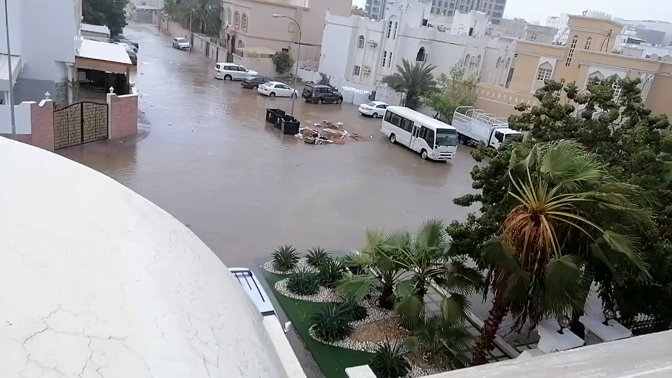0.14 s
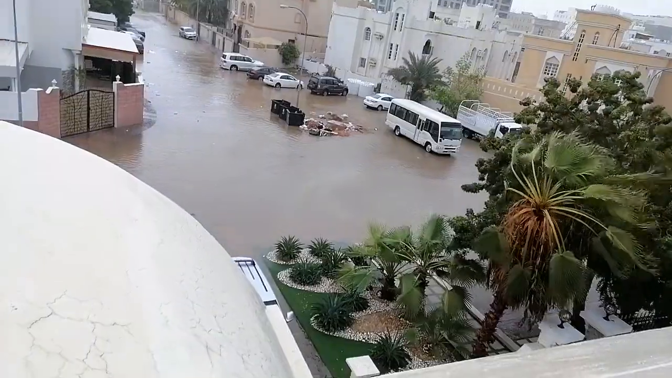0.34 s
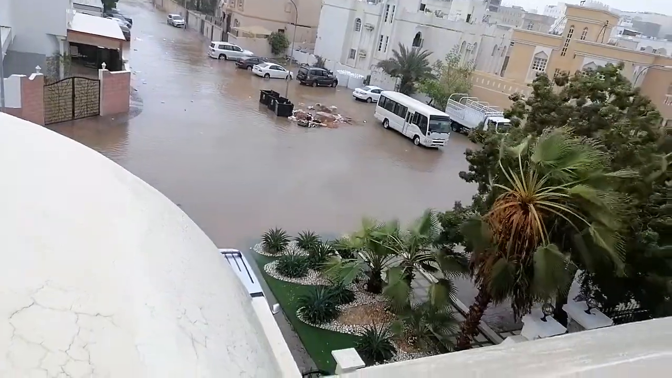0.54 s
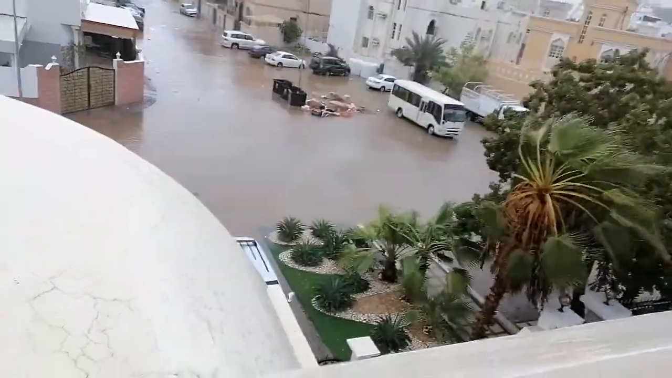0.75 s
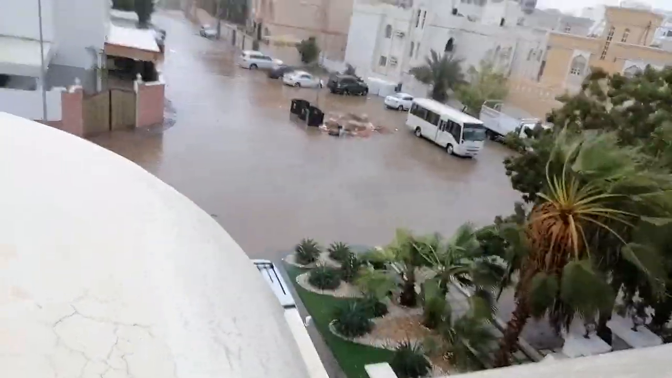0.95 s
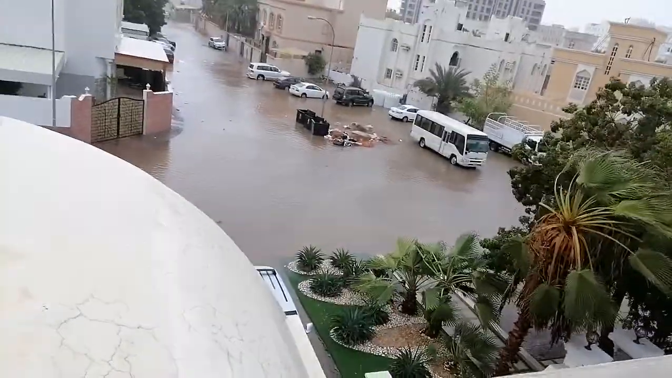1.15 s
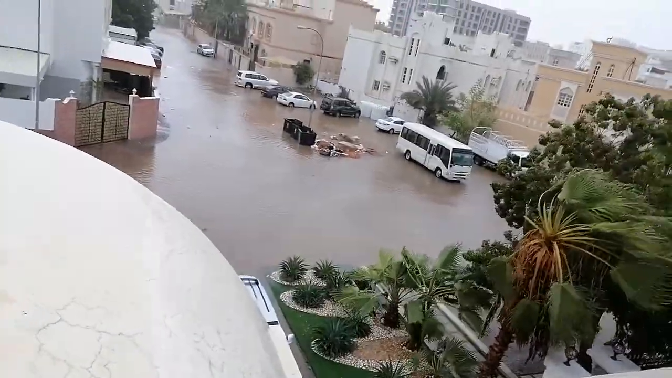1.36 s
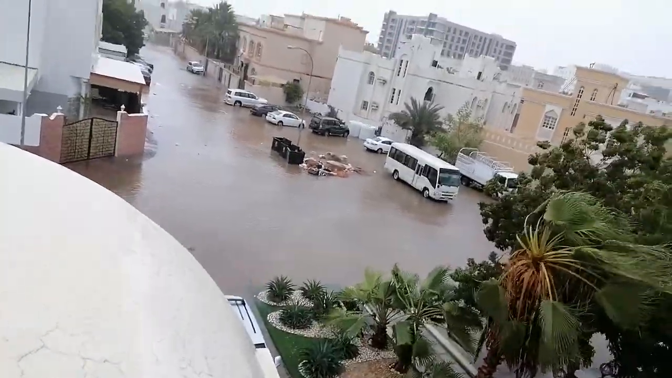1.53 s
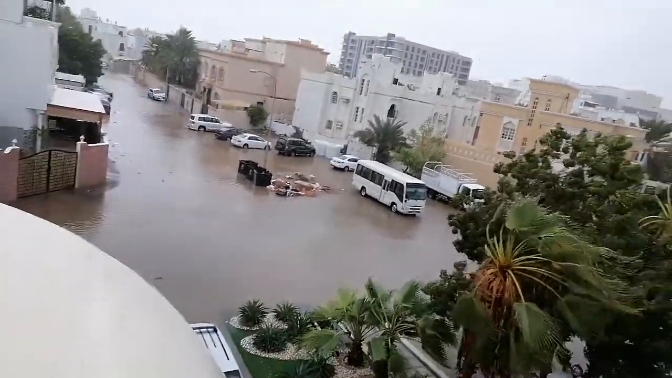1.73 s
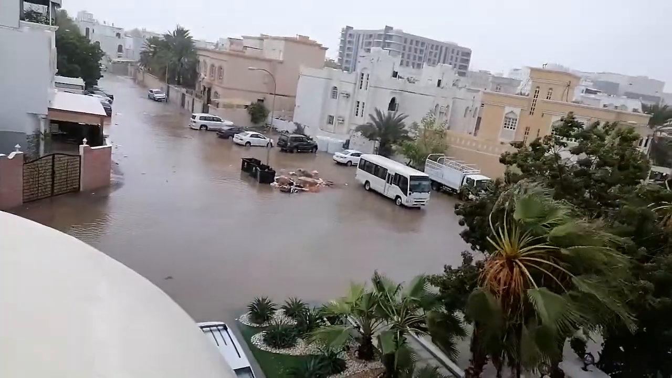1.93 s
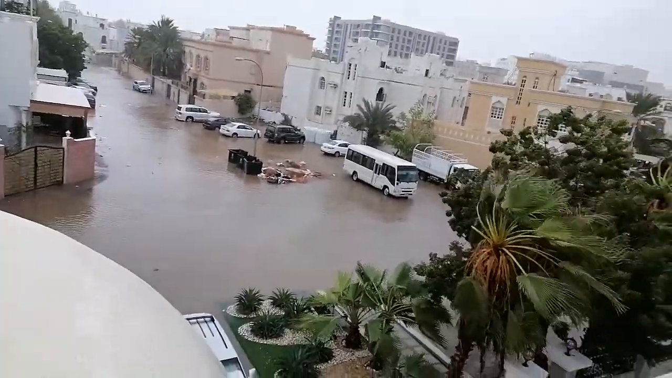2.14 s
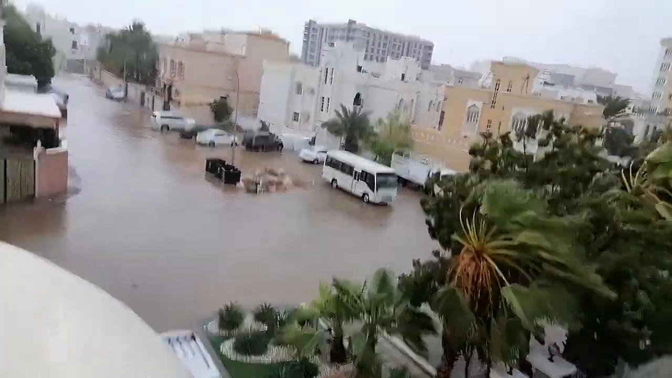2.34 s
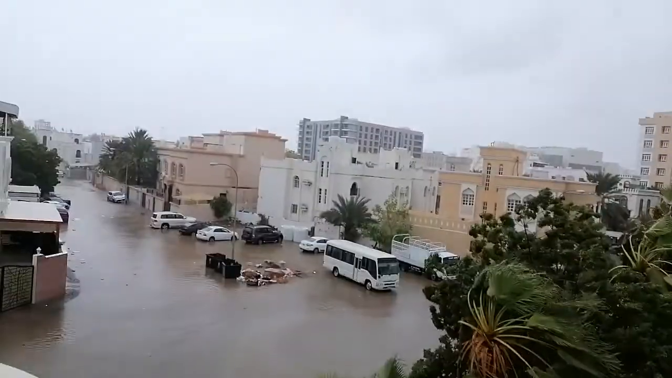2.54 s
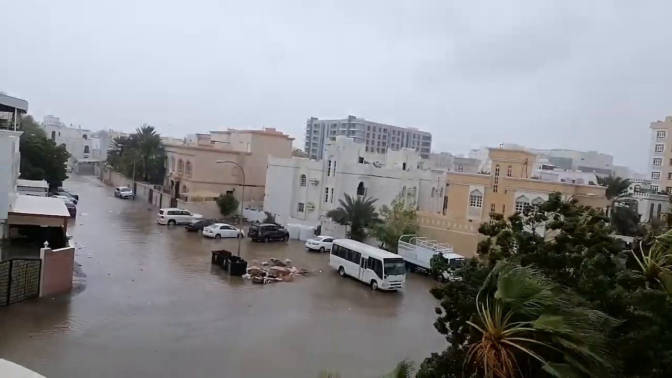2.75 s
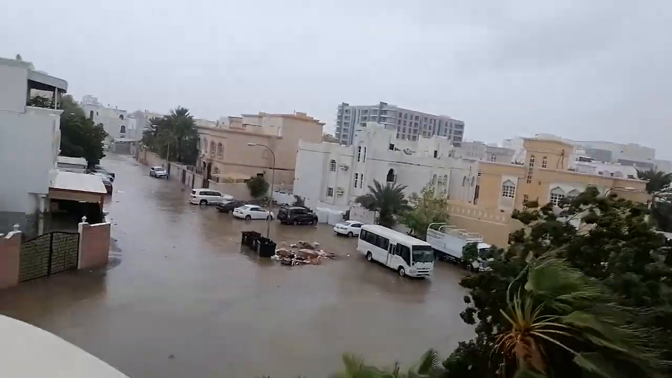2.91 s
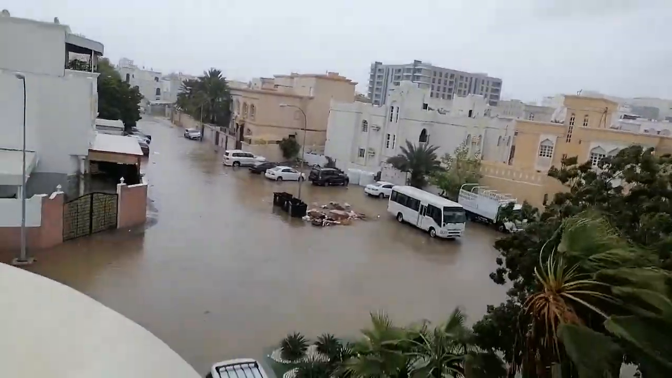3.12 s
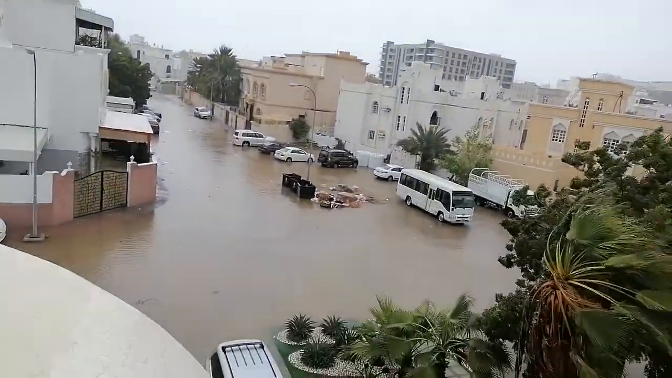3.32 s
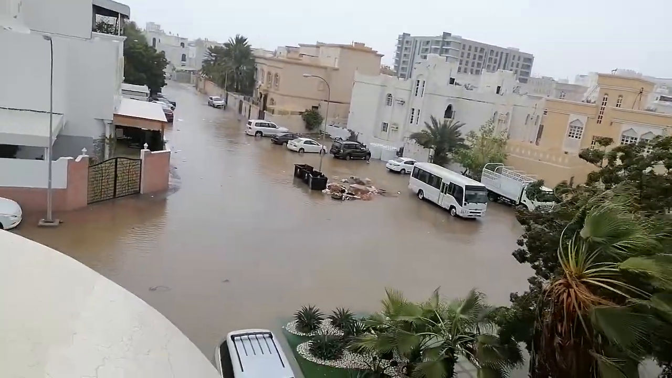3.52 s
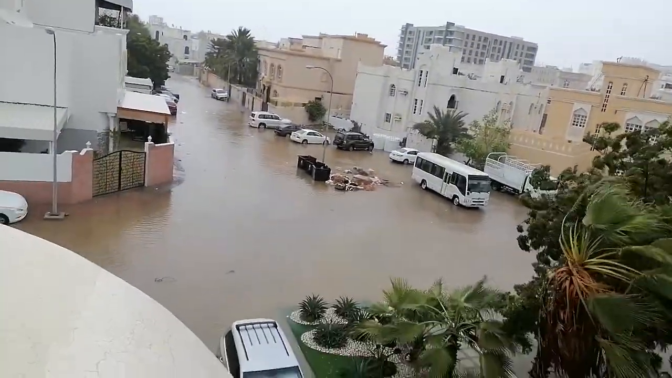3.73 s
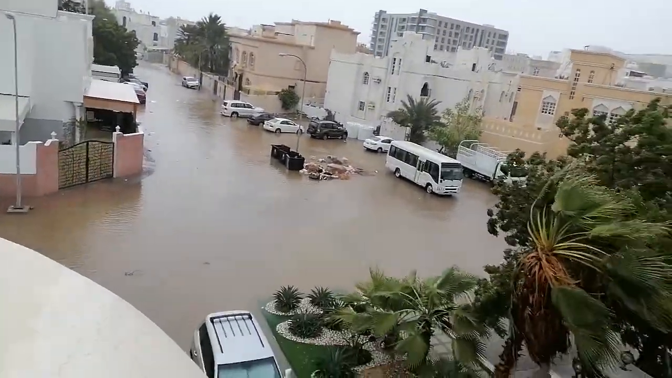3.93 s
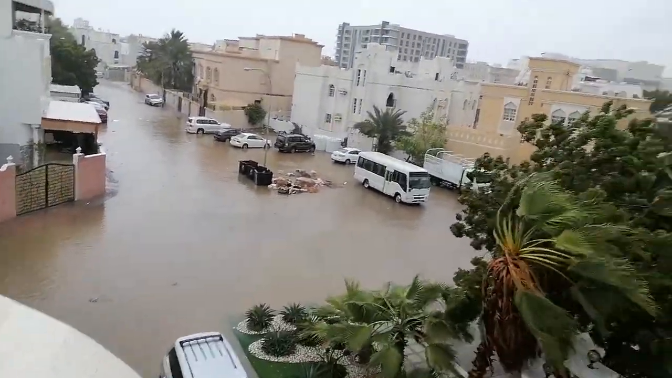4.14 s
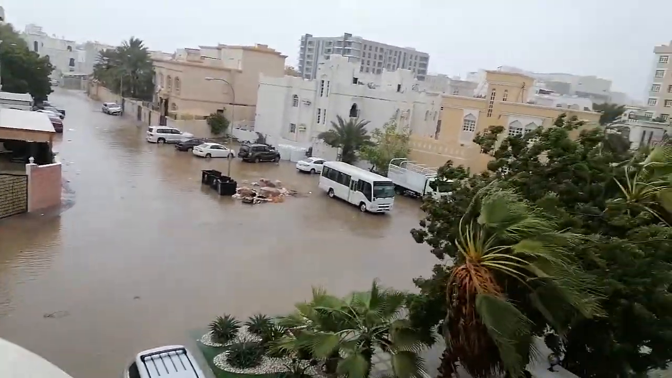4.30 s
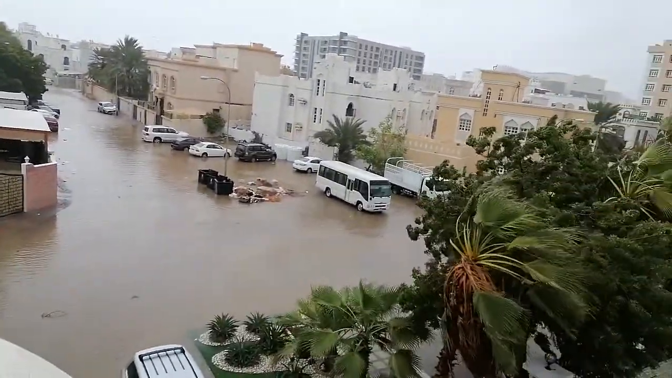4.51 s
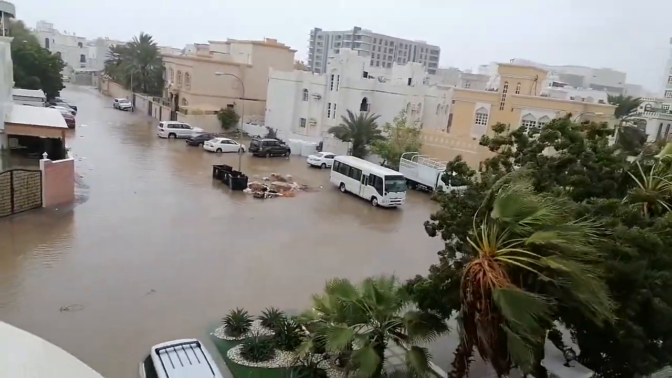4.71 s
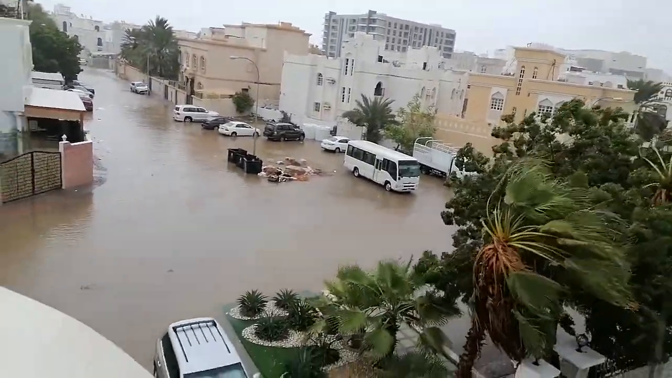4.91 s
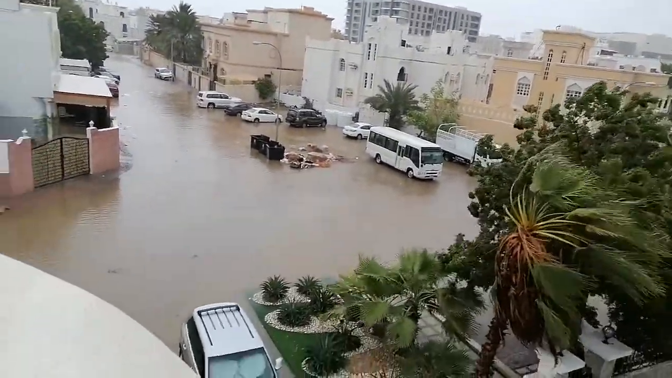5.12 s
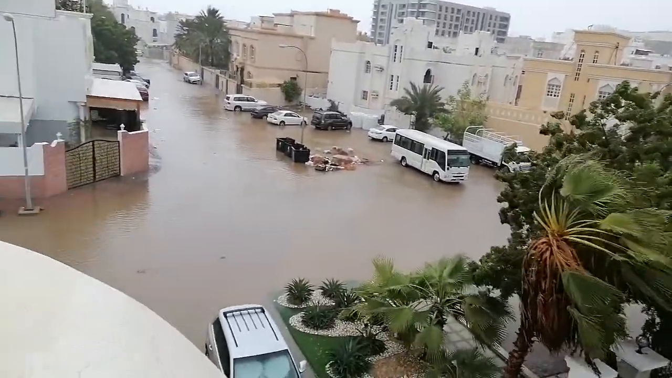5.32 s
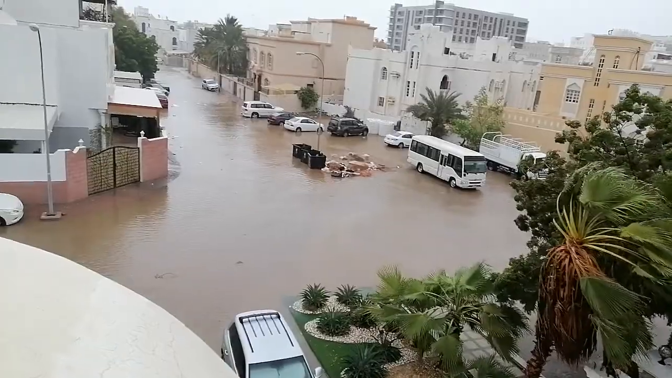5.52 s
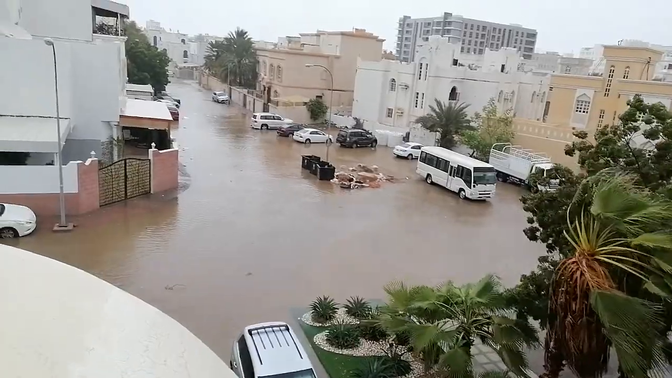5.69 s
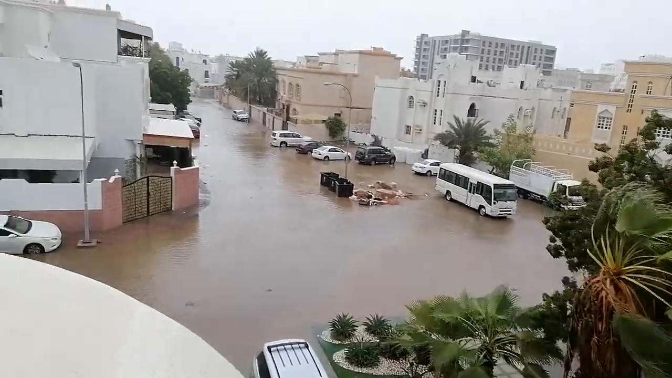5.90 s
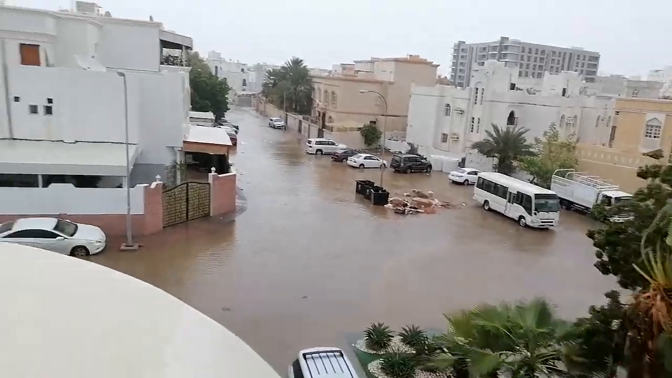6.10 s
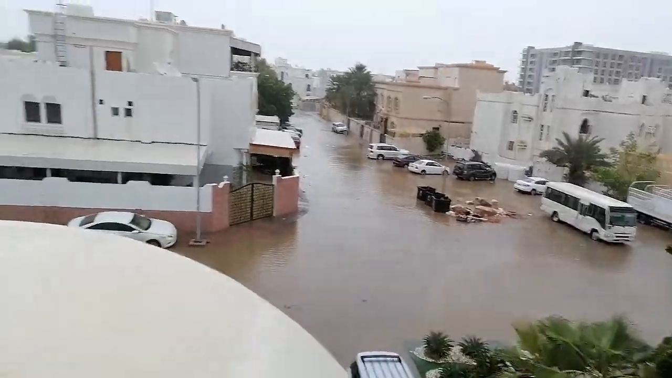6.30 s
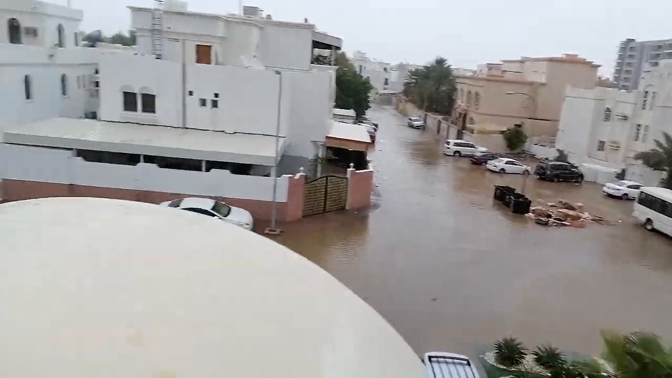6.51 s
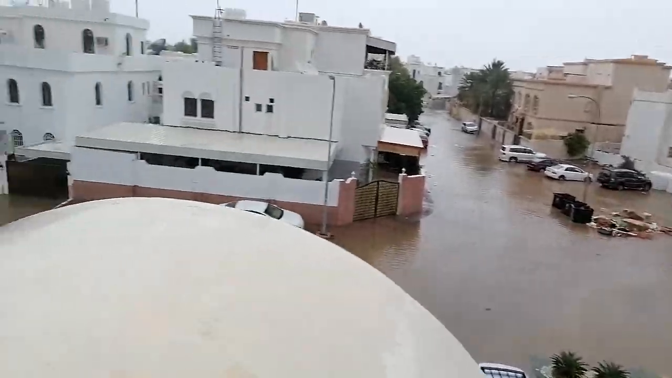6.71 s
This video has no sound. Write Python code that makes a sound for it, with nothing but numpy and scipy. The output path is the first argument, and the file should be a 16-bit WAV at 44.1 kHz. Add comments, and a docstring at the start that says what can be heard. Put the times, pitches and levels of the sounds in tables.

```python
"""Rooftop storm wind on a phone

After a short silence, wind cuts in and buffets a hand-held phone's two microphone ports, each on its own.
Eddies slap the ports, louder and brighter as the air speeds up, and the fastest tear off with a snap.
Rain hisses and trees roar in the street below, pushed down by gain control under each gust.
A few drops strike the case and make it ring; one throws a hiss of spray."""
import sys
import numpy as np
from scipy import signal
from scipy.fft import rfft, irfft, next_fast_len
from scipy.io import wavfile
from scipy.ndimage import uniform_filter1d

SR = 44100
rng = np.random.default_rng(int(sys.argv[2]) if len(sys.argv) > 2 else 0)


def unload_audio(sound):
    """Save the sound as a 16-bit wav file, at the path given as the first command line argument."""
    columns = np.transpose(np.atleast_2d(sound))
    # keep every value between -1 and 1, then stretch to whole-number steps
    steps = np.round(np.clip(columns, -1, 1) * 32767)
    wavfile.write(sys.argv[1], SR, steps.astype(np.int16))


N = 297675

# steady flow over the ports: (time [s], left level [dB], right level [dB], left air speed [m/s])
STEADY_FLOW = [(0.4, -32.5, -37, 11.7), (0.64, -36.5, -53, 4.1), (0.7, -24.5, -51, 17.3),
               (0.87, -33, -42, 18), (0.92, -39, -36, 30), (0.97, -30, -42, 17.6), (1.04, -26, -44, 15.7),
               (1.18, -41, -27, 38.4), (1.25, -34, -40, 5), (1.7, -30, -40, 5.35), (1.86, -50, -51, 6.3),
               (2.0, -29, -27, 4.23), (2.42, -23.5, -44.5, 5.9), (2.6, -29, -47, 4.7),
               (2.88, -38.5, -52, 6.1), (3.05, -38.5, -49, 2.95), (3.3, -27.5, -35, 5.84),
               (3.85, -24, -31, 5.84), (4.1, -32, -42, 5), (4.6, -34.5, -43, 4), (4.75, -20.5, -43, 7.9),
               (4.85, -41, -38, 6), (5.1, -29, -52, 5.2), (5.3, -39.5, -60, 3.1), (5.5, -30.5, -45, 7.2),
               (6.1, -32.5, -38, 4.3), (6.25, -40.5, -39.5, 1.9), (6.45, -18.5, -38, 6.5),
               (6.59, -25, -36, 10.7), (6.64, -24, -38, 6.7), (6.75, -15, -21.5, 14.5)]
# the strongest eddies, each slapping one port: (time [s], port [0 left, 1 right], level [dB], length [ms])
EDDY_SLAPS = [(.42, 0, -27.5, 14), (.442, 0, -20.5, 7), (.458, 0, -18.5, 14.6), (.515, 0, -28.5, 35),
              (.515, 1, -31.5, 80), (.686, 0, -24, 13.5), (.718, 0, -21, 12), (0.763, 0, -18.5, 33),
              (0.798, 0, -17, 10), (.815, 1, -28, 61), (.82, 0, -20, 32), (0.87, 0, -22, 8),
              (0.919, 0, -17, 26), (0.948, 0, -21.5, 10), (.976, 0, -20, 14), (.991, 1, -26.5, 27),
              (1.001, 0, -18, 1.9), (1.028, 0, -19.5, 17.4), (1.073, 0, -18.5, 14.4),
              (1.128, 0, -23.5, 19.4), (1.133, 1, -21.5, 29), (1.145, 0, -22.5, 8), (1.167, 0, -23.5, 28),
              (1.196, 0, -31, 8.8), (1.365, 1, -28, 30), (1.387, 0, -25.5, 35), (1.452, 0, -16.5, 16.4),
              (1.48, 1, -36, 74), (1.507, 0, -18, 14), (1.566, 0, -20, 14), (1.61, 0, -27.5, 51),
              (1.689, 0, -15, 11), (1.705, 1, -31, 46), (1.713, 0, -13.5, 15.3), (1.75, 0, -21.5, 15),
              (1.8, 0, -26, 52), (1.926, 0, -15.5, 8), (1.955, 1, -26.5, 35), (1.967, 0, -17, 46),
              (2.044, 0, -11.5, 16.2), (2.047, 1, -23.5, 58), (2.127, 0, -18, 41), (2.19, 1, -27, 55),
              (2.273, 0, -21, 12), (2.331, 0, -23.5, 40), (2.376, 0, -16, 10.4), (2.41, 0, -11.5, 22),
              (2.41, 1, -33, 43), (2.451, 0, -10, 6.9), (2.55, 0, -20.5, 36), (2.765, 0, -30, 53),
              (2.962, 0, -21, 40), (3.1, 0, -26, 24), (3.205, 0, -25.5, 42), (3.29, 0, -25.5, 47),
              (3.33, 1, -28, 25), (3.389, 0, -24, 11), (3.41, 1, -27, 40), (3.472, 0, -14, 35),
              (3.504, 0, -18, 21), (3.585, 0, -17.5, 43), (3.617, 0, -13, 29), (3.64, 1, -29, 40),
              (3.729, 0, -14.5, 18), (3.814, 0, -22.5, 39), (3.82, 1, -30, 45), (3.87, 1, -26, 24),
              (3.944, 0, -22, 23), (3.974, 0, -19.5, 17), (4.152, 0, -27, 30), (4.2, 1, -36, 30),
              (4.242, 0, -22.5, 48), (4.41, 1, -31, 49), (4.47, 0, -21.5, 37), (4.58, 1, -28.5, 57),
              (4.646, 0, -27.5, 30), (4.692, 0, -19.5, 24), (4.748, 0, -16, 23), (4.81, 0, -29, 26),
              (4.911, 0, -25.5, 44), (5.047, 0, -24, 50), (5.1, 1, -25.5, 14), (5.158, 0, -23, 45),
              (5.451, 0, -22.5, 38), (5.575, 0, -31, 11), (5.664, 1, -28.5, 36), (5.685, 0, -16, 17.6),
              (5.79, 0, -29, 93), (5.85, 0, -24, 28), (5.894, 0, -22.5, 26), (5.959, 0, -18, 24),
              (6.091, 0, -17.5, 42), (6.16, 0, -28.5, 41), (6.18, 1, -29.5, 20), (6.271, 0, -25.5, 31),
              (6.434, 0, -23, 18), (6.493, 0, -18.5, 4.6), (6.513, 0, -18.5, 14), (6.515, 1, -29, 87),
              (6.545, 0, -15.5, 7.7), (6.592, 0, -13.5, 8.4), (6.681, 0, -13.5, 14.4),
              (6.695, 1, -27.5, 50), (6.7, 0, -16.5, 5.7), (6.717, 0, -14.5, 13), (6.735, 0, -10, 6.2)]
# swells of the distant storm bed: (time [s], rain level [dB], tree level [dB])
STORM_SWELLS = [(.42, -85, -82.5), (.66, -87.5, -82.5), (1.1, -98, -90), (1.4, -86, -82),
                (1.66, -83, -82.5), (1.95, -87.5, -84), (2.3, -85, -80), (2.6, -87.5, -85),
                (2.86, -83.5, -78), (3.0, -86, -82.5), (3.3, -88, -84.5), (3.6, -85, -84.5),
                (3.95, -88, -85.5), (4.17, -85, -80.5), (4.28, -89, -86.5), (4.42, -86, -81.5),
                (4.65, -86.5, -83), (4.85, -90.5, -87.5), (5.15, -87, -86), (5.37, -84.5, -81.5),
                (5.5, -88, -87), (6.1, -88, -85), (6.4, -82.5, -82), (6.7, -91.5, -85.5)]
# tone of the rain hiss: (frequency [Hz], gain [dB])
RAIN_TONE = [(300, -39), (2000, -31.5), (4000, -1.5), (8000, -1), (16000, 7)]
# tone of the roaring trees: (frequency [Hz], gain [dB])
TREE_TONE = [(60, 14), (300, 7), (700, 0.5), (1500, -1), (3400, -6), (4500, -11), (16000, -28)]
# pressure jumps at the left port: (time [s], level [dB], edge length [ms])
PRESSURE_SNAPS = [(.6815, -3.5, 0.4), (.7705, -9, 0.071), (0.789, -14, 0.15), (0.876, -4, 0.29),
                  (0.903, -10, 0.077), (0.9378, -14, 0.065), (1.0687, -6, 0.14), (1.073, -18, 0.11),
                  (1.1248, -3, .15), (1.146, -30, .1), (1.153, -12, 0.042), (1.17, -4, 0.061),
                  (1.195, -22, 0.076), (2.4503, -14, 0.42), (4.748, -11, 0.18), (5.684, -14.5, 0.18),
                  (6.54, -5, 0.21), (6.587, -27, 0.16), (6.594, -6.5, 0.13), (6.682, -6, 0.13),
                  (6.7211, -19, 0.064), (6.7355, -15, 0.041)]
# drops on the case: (time [s], port [0 left, 1 right], ring level [dB], pitch [Hz], tick level [dB])
DROP_HITS = [(.854, 1, -28, 3600, -41), (.909, 1, -35, 1500, -52), (1.331, 1, -30, 2510, -50),
             (1.4072, 1, -14.5, 2400, -56.5), (1.743, 1, -47, 4000, -39), (2.047, 0, -24, 9000, -42),
             (4.0355, 1, -21, 1660, -35), (4.5972, 1, -14, 1090, -52), (4.8085, 0, -37, 5600, -54),
             (4.987, 1, -32, 4700, -52), (5.073, 1, -45, 6000, -39), (5.76, 0, -33, 11000, -46),
             (6.215, 1, -33, 2000, -39), (6.671, 1, -48, 6000, -41)]
# water thrown past the left port: (time [s], level [dB], centre [Hz], width [Hz], t60 [ms])
SPRAY_BURSTS = [(4.607, -36, 7900, 2000, 160)]
# modes of the case under a heavy drop: (ring level [dB], pitch [Hz], tick level [dB], t60 [ms])
CASE_MODES = [(6, 320, -14.5, 10), (-2.5, 746, -21.5, 10.3), (-19, 2070, -17, 7.3)]
# colour of the left port's channel and cavity: (frequency [Hz], gain [dB])
LEFT_PORT_EQ = [(20, -6), (50, -1.5), (130, 2), (1000, 0.5), (1400, -3), (2700, -1.5), (3300, 0.5),
                (3900, -10), (5200, -1), (7300, -3.5), (8600, 5), (9700, -4), (10800, -12.5),
                (15000, -21.5), (15700, -21)]
# colour of the right port's channel and cavity: (frequency [Hz], gain [dB])
RIGHT_PORT_EQ = [(20, -11.5), (50, 0.5), (130, -1), (1050, 1.5), (1400, -6.5), (3100, 5), (3500, -2.5),
                 (3900, -11.5), (4700, -23), (5250, -10), (6000, -21), (9000, -24.5), (11500, -31),
                 (15000, -43)]

TIME = np.arange(N) / SR
HIT_TIME = np.arange(4410) / SR  # clock for one drop or burst of spray
LEE_SPEED = 4.9  # m/s at the sheltered right port


def gain_of(db):
    """Decibels to amplitude."""
    return 10 ** (np.asarray(db) / 20)


def tone_db(curve, hz):
    """An EQ curve's gain at hz, on a log-frequency axis."""
    corner_hz, db = np.transpose(curve)
    return np.interp(np.log(hz + 1), np.log(corner_hz + 1), db)


def coloured(sound, curve):
    """Shapes a sound with an EQ curve."""
    size = next_fast_len(N)
    gain = gain_of(tone_db(curve, np.fft.rfftfreq(size, 1 / SR)))
    return irfft(rfft(sound, size) * gain, size)[..., :N]


def wander(count, span):
    """Smooth random modulation of rms 1 that changes over span steps."""
    taps = np.exp(-(np.arange(-200, 201) / span) ** 2)
    return signal.fftconvolve(rng.standard_normal(count), taps / np.linalg.norm(taps), "same")


def reach(speed, db, hz_per_speed=65.6, usual_db=-24, brighten=0.5):
    """How high the wind's spectrum reaches, in Hz: faster air and stronger eddies are brighter."""
    return np.maximum(hz_per_speed * speed * gain_of(brighten * (db - usual_db)), 110)


def turbulence(hz, db, reach_hz, bend=0.83, soften=0.095):
    """Power per Hz of eddying air, 20 dB down at its reach; faster air rolls off more gently."""
    rolloff = (hz[:, None] / reach_hz) ** (bend * (reach_hz / 600) ** -soften)
    shape = 0.01 ** rolloff
    return gain_of(2 * db) * shape / (np.gradient(hz) @ shape)


def buffeting(port, flutter_db=2.0, sharpen=0.11, flow_reach=0.79):
    """Wind on one port: bands of noise ride the power of the steady flow and the brighter eddy slaps."""
    t = np.arange(0, N + 44, 44) / SR  # control steps of about 1 ms
    hz = np.geomspace(20, 14000, num=24)
    flow_s, *levels, left_speed = np.transpose(STEADY_FLOW)
    speed = np.interp(t, flow_s, left_speed) if port == 0 else np.full(len(t), LEE_SPEED)
    flutter = 1.136 * wander(len(t), span=1.9) + .5 * wander(len(t), span=7.5)
    swing_db, brightness = flutter_db * flutter, np.exp(sharpen * flutter)
    small_eddies_db = 1.5 * wander(len(t), span=19.8)
    flow_db = np.interp(t, flow_s, levels[port]) + small_eddies_db
    power = turbulence(hz, flow_db + swing_db, flow_reach * reach(speed, flow_db) * brightness)
    for s, eddy_port, db, ms in EDDY_SLAPS:
        if round(eddy_port) == port:
            near = abs(t - s) < 2 * ms / 1000
            reach_hz = reach(np.interp(s, t, speed), db)
            span_ms = ms * np.minimum(0.9 * reach_hz / hz[:, None], 1) ** 0.5  # fine ripples pass more quickly
            swell = .5 ** ((2000 * (t[near] - s) / span_ms) ** 2)
            power[:, near] += swell * turbulence(hz, db + swing_db[near], reach_hz * brightness[near])
    size = next_fast_len(N)
    noise = rfft(rng.standard_normal(size)) * np.sqrt(SR / 2)
    band_index = np.interp(np.log(np.fft.rfftfreq(size, 1 / SR) + 1), np.log(hz), np.arange(len(hz)))
    bands = (irfft(noise * np.maximum(1 - abs(band_index - k), 0), size)[:N] for k in range(len(hz)))
    return sum(band * np.interp(TIME, t, np.sqrt(p)) for band, p in zip(bands, power))


def storm_wash(tone, column, patchy_db, shared):
    """Distant rain or trees: a wide noise bed with drifting patches, partly shared by the ports."""
    frames, hz = N // 128 + 5, np.fft.rfftfreq(512, 1 / SR)
    left_re, left_im, side_re, side_im, patches = rng.standard_normal((frames, len(hz), 5)).T
    patches = uniform_filter1d(patches, size=6, axis=0)  # smooth across pitch
    patches = uniform_filter1d(patches, size=20, axis=1)  # and across time
    swells = np.transpose(STORM_SWELLS)
    level_db = np.interp(np.arange(frames) * 128 / SR, swells[0], swells[column])
    left = left_re + 1j * left_im
    right = shared * left + np.sqrt(1 - shared ** 2) * (side_re + 1j * side_im)
    unit = signal.istft(left, nperseg=512, noverlap=384)[1].std() / np.sqrt(SR / 2)
    gain = gain_of(tone_db(tone, hz)[:, None] + patchy_db * patches / patches.std() + level_db)
    return signal.istft(np.array([left, right]) * gain, nperseg=512, noverlap=384)[1][:, :N] / unit


def rain_patter(ticks_per_s=300, db=-60, spread_db=2.5, t60_s=0.012):
    """Nearer raindrops: sparse ticks of uneven size with a short tail, dipping with the rain."""
    sizes = gain_of(spread_db * np.minimum(rng.exponential(1, (2, N)), 5))
    impacts = sizes * (rng.random((2, N)) < ticks_per_s / SR)
    t = np.arange(600) / SR
    tail = rng.standard_normal(len(t)) * gain_of(-60 * t / t60_s)
    ticks = signal.fftconvolve(impacts, tail[None])[:, :N]
    s, rain_db, _ = np.transpose(STORM_SWELLS)
    return coloured(ticks, RAIN_TONE) * gain_of(db + np.interp(TIME, s, rain_db - rain_db.mean()))


def ducking(wind, highpass_hz=402, window_s=0.023, knee_db=-38, depth=0.36):
    """Gain control keyed by the wind: it dips quickly under a gust and recovers slowly."""
    sidechain = signal.sosfilt(signal.butter(2, highpass_hz, "high", fs=SR, output="sos"), wind)
    power = uniform_filter1d((sidechain ** 2).sum(0), round(window_s * SR))
    power_db = 10 * np.log10(abs(power) + 1e-12)
    release_db = 57 * TIME
    held_db = np.maximum.accumulate(power_db + release_db) - release_db
    over_db = np.maximum(held_db - knee_db, 0)
    return gain_of(-depth * uniform_filter1d(over_db, size=1600))


def wind_snaps():
    """The fastest eddies tear off: the pressure jumps either way, then overshoots as it leaks off."""
    out, ms = np.zeros(N + SR), np.arange(882) / SR * 1000
    for (s, db, edge_ms), sign in zip(PRESSURE_SNAPS, rng.choice([-1, 1], len(PRESSURE_SNAPS))):
        leak_ms = 0.98 + 0.74 * edge_ms  # slower after a blunt edge
        attack = 1 - np.exp(-(ms / edge_ms) ** 2)
        leak = (1 - 0.61 * ms / leak_ms) * np.exp(-.6 * ms / leak_ms)
        out[round(s * SR):][:len(ms)] += sign * gain_of(db) * attack * leak
    return out[:N]


def case_hit(s, ring_db, hz, tick_db, t60_ms):
    """Water strikes the case: a noisy tick and a short ring that settles onto its pitch."""
    out, t = np.zeros(N + SR), HIT_TIME
    phase = 2 * np.pi * hz * t * (1 + .5 * np.exp(-t * hz))
    ring = gain_of(ring_db - 60000 * t / t60_ms) * -np.sin(phase)
    ring *= 1 - np.exp(-2.5 * hz * t)  # the water flattens before it pushes fully
    burst = gain_of(tick_db - 60000 * t / (1.5 + .3 * t60_ms)) * np.minimum(20000 * t / t60_ms, 1)
    tick = burst * signal.lfilter([1], [1, -.75], rng.standard_normal(len(t)))
    out[round(s * SR):][:len(t)] = ring + tick
    return out[:N]


def drops():
    """Single drops ping the case, each heard at one port."""
    out = np.zeros((2, N))
    for s, port, ring_db, hz, tick_db in DROP_HITS:
        t60_ms = 5.6 * (1000 / hz) ** 0.27  # higher rings die sooner
        out[round(port)] += case_hit(s, ring_db, hz, tick_db, t60_ms)
    return out


def spray():
    """Water flies past the port in a thin, fading hiss."""
    out, t = np.zeros(N + SR), HIT_TIME
    for s, db, hz, width, t60_ms in SPRAY_BURSTS:
        band = signal.butter(2, [hz - width / 2, hz + width / 2], "band", fs=SR, output="sos")
        hiss = signal.sosfilt(band, rng.standard_normal(len(t)))
        out[round(s * SR):][:len(t)] += gain_of(db - 60000 * t / t60_ms) * hiss / hiss.std()
    return out[:N]


def heavy_drop(s=4.7769, stagger_s=.00035):
    """A heavy drop knocks the whole case; each higher mode starts later as the water spreads."""
    return sum(case_hit(s + stagger_s * k, *mode) for k, mode in enumerate(CASE_MODES))


def scene():
    """Wind and the ducked storm bed pass through the ports; drops and spray bypass their colour."""
    rain = storm_wash(RAIN_TONE, column=1, patchy_db=1.4, shared=0.073)
    trees = storm_wash(TREE_TONE, column=2, patchy_db=1.77, shared=0.066)
    storm = rain + trees + rain_patter()
    wind = np.array([buffeting(port=0) + wind_snaps(), buffeting(port=1)])
    air = wind + ducking(wind) * storm
    mix = np.array([coloured(air[0], LEFT_PORT_EQ), coloured(air[1], RIGHT_PORT_EQ)]) + drops()
    mix[1] += heavy_drop()
    mix[0] += spray()
    return mix


def record(dry):
    """The input stage rounds off the peaks; the sound cuts in from silence, its top end filtered off."""
    ceiling, start_s, fade_s, cutoff_hz = 0.59, 0.3956, 0.00071, 15750
    saturated = ceiling * np.tanh(dry / ceiling)
    gate = np.clip((TIME - start_s) / fade_s, 0, 1)
    lowpass = signal.firwin(511, cutoff_hz, window=("kaiser", 9), fs=SR)
    return signal.oaconvolve(saturated * gate, lowpass[None], "same")


dry = scene()
out = record(dry)
unload_audio(out)
```